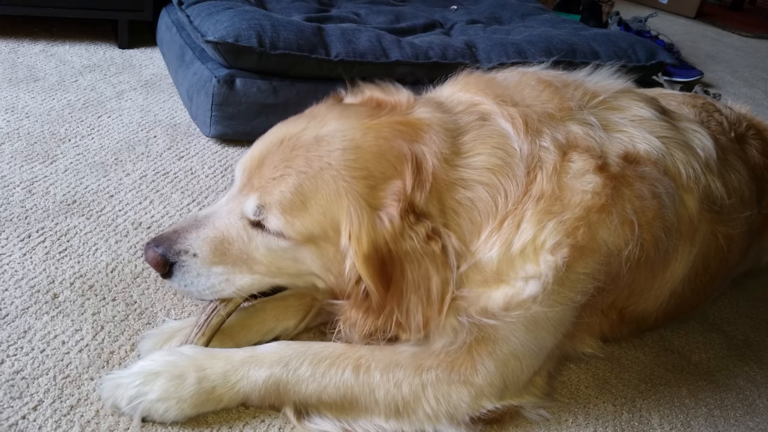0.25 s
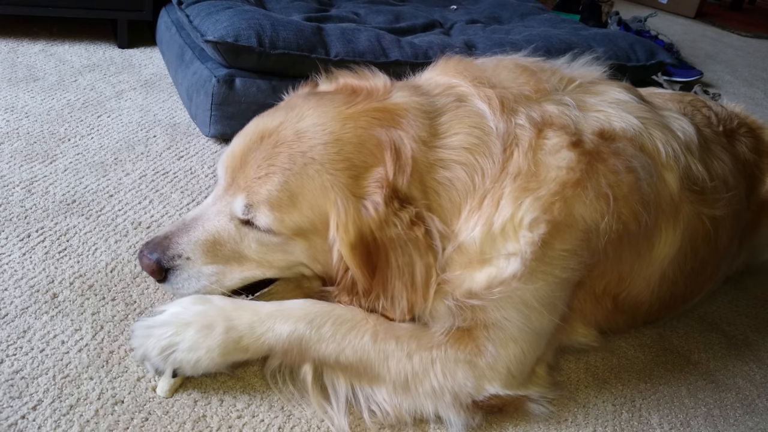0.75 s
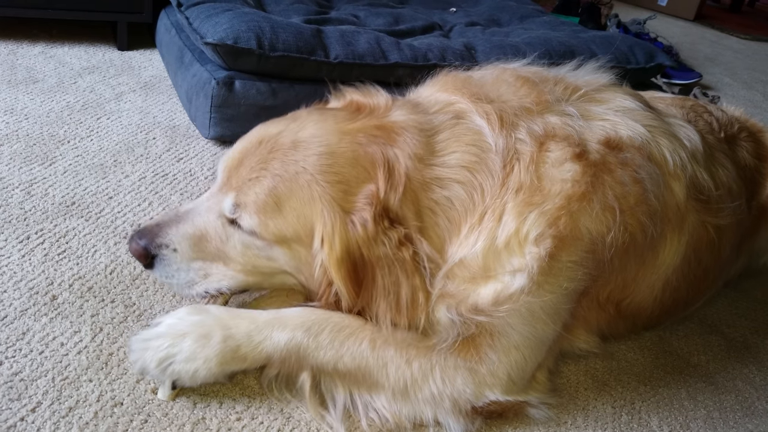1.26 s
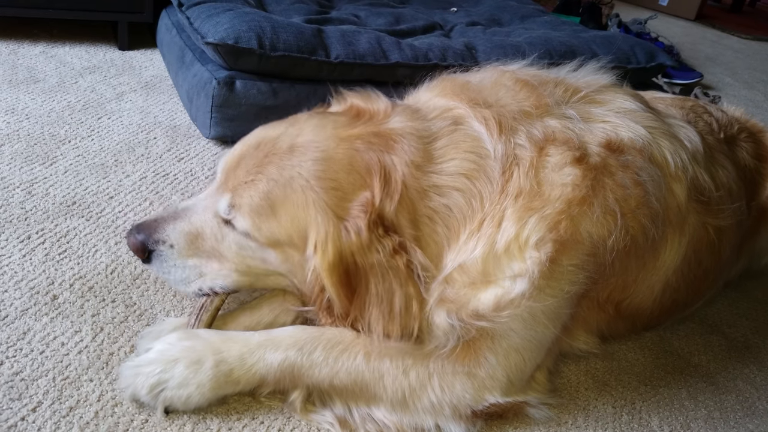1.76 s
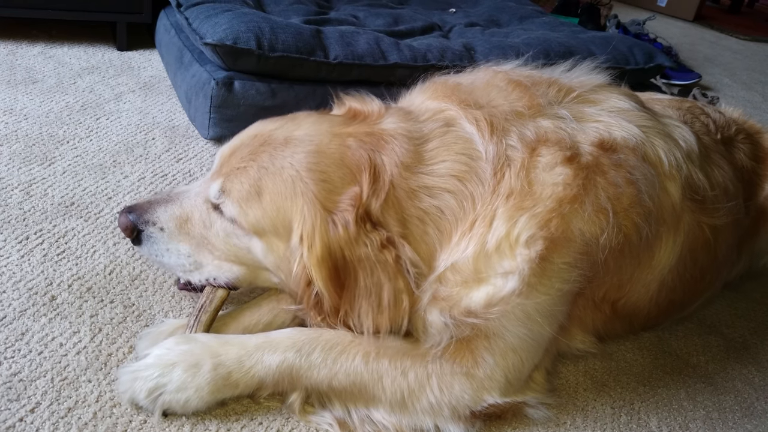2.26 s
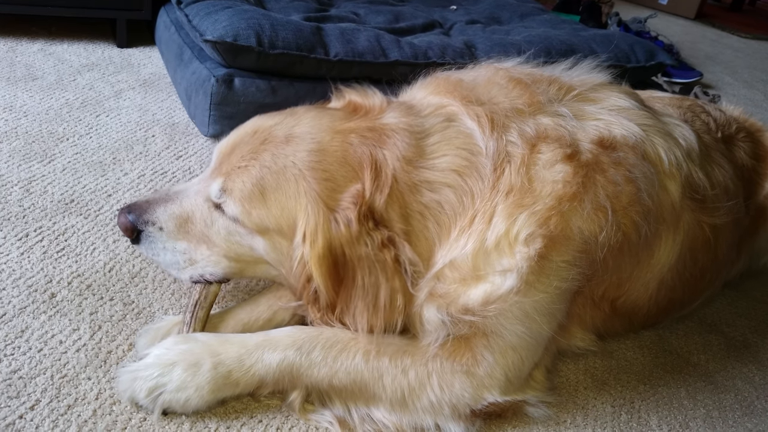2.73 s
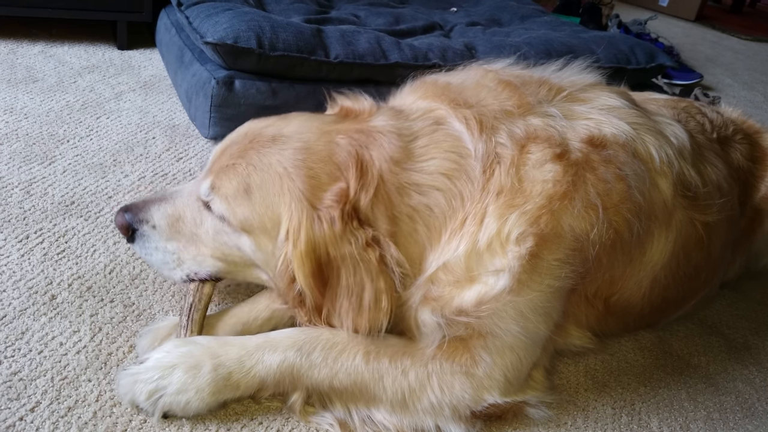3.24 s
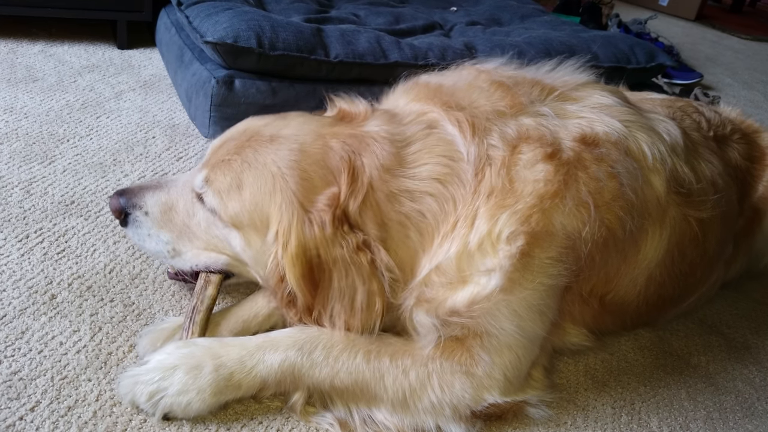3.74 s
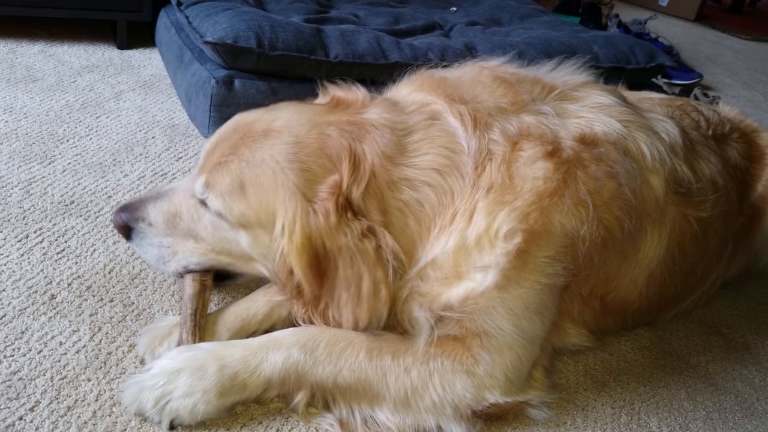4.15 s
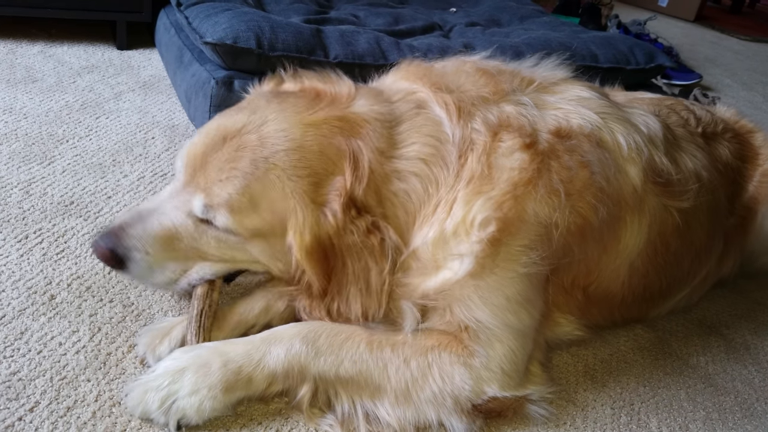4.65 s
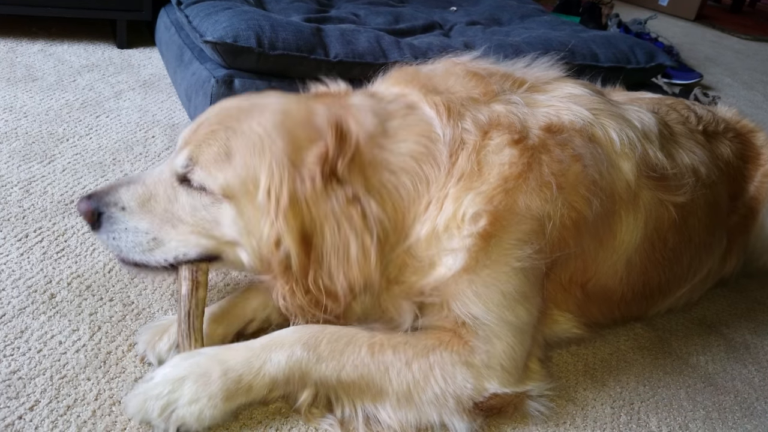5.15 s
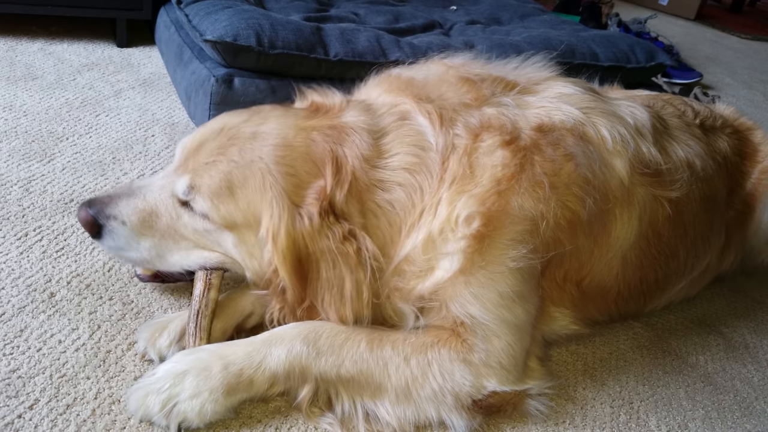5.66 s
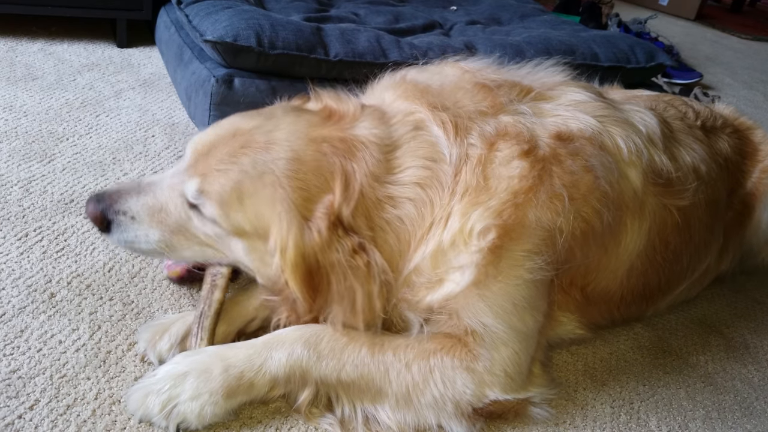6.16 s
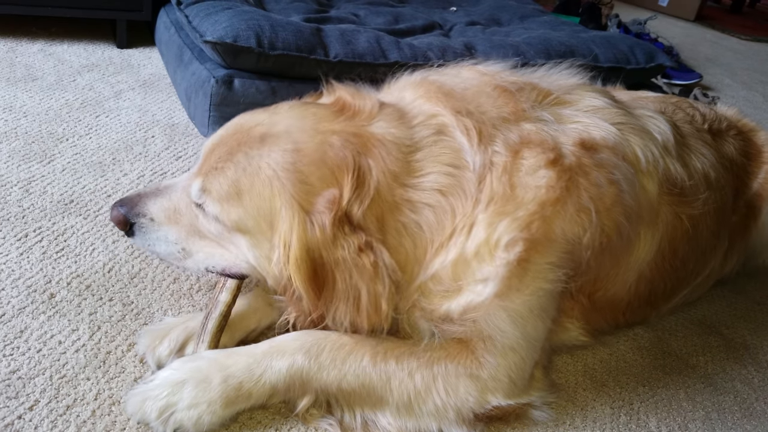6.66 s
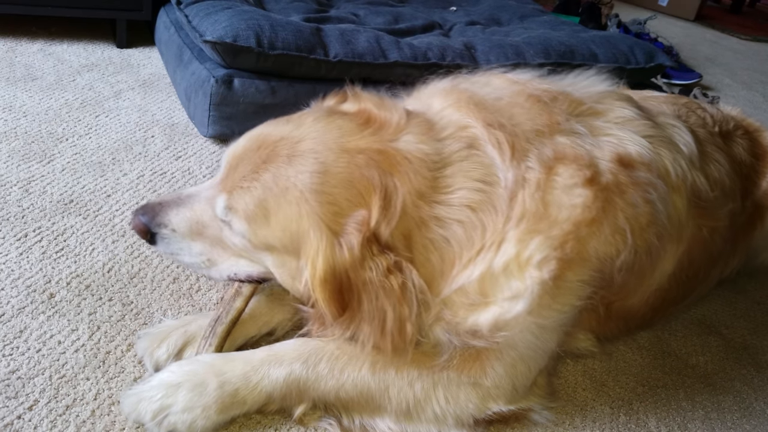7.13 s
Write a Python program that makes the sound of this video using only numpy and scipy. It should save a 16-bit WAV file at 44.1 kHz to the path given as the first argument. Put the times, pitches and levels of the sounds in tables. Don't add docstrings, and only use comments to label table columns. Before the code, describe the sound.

A dog gnaws an antler on carpet, a metre from a hand-held stereo phone in a quiet living room. A quick cluster of faint clacks opens, with a soft rub; light knocks follow around 1 s, a sharper bite at 1.25 and a bony crack at 1.75, then a heavy low handling thump at 1.8, mostly left. Small pops come at 2.2 and 2.75, a double crunch at 3.25. At 3.95 the loudest bite snaps brightly and the antler rings hollowly for about half a second. Scattered clacks continue, with hard cracks at 5.15 and 5.25, more at 5.8 and 5.9, then dense knocks and gritty chips from 6.3 to 6.6 and 6.9 to 7.3. Throughout, fur and paws drag dully, nostrils puff thin air, the grip thumps softly, and a distant appliance whine and low hum waver under gentle hiss.

```python
import sys
import numpy as np
from scipy import signal
from scipy.fft import rfft, irfft
from scipy.io import wavfile
from scipy.ndimage import uniform_filter1d

SR = 44100
rng = np.random.default_rng(int(sys.argv[2]) if len(sys.argv) > 2 else 0)


def transcribe(u):
    v = np.clip(np.atleast_2d(u).T, -1, 1)
    q = np.round(v * 32767).astype(np.int16)
    wavfile.write(sys.argv[1], SR, q)


def decibels_to_gain(level_db):
    exponent = np.asarray(level_db, float) / 20
    return 10 ** exponent


N = 326340
STRIKE_T_S = np.arange(4096) / SR
RIGHT_LAG_SAMPLES = 7


def curve(table):
    rows = np.array(table, float)
    return np.interp(np.arange(N) / SR, rows[:, 0], rows[:, 1])


def colour(x, db_of_hz):
    hz = np.maximum(np.fft.rfftfreq(x.shape[-1], 1 / SR), 1)
    if callable(db_of_hz):
        gain_db = db_of_hz(hz)
    else:
        rows = np.array(db_of_hz, float)
        gain_db = np.interp(np.log(hz), np.log(rows[:, 0]), rows[:, 1])
    return irfft(rfft(x) * decibels_to_gain(gain_db), x.shape[-1])


def unit(x):
    return x / np.sqrt(np.mean(x ** 2))


def pair(table, likeness_hz):
    common, own = rng.standard_normal(N), rng.standard_normal((2, N))
    both = np.array([common, np.roll(common, RIGHT_LAG_SAMPLES)])
    alike = colour(both, lambda hz: -10 * np.log10(1 + (hz / likeness_hz) ** 2))
    apart = colour(own, lambda hz: -10 * np.log10(1 + (likeness_hz / hz) ** 2))
    return colour(alike + apart, table)


def walk(rate_hz):
    hold = int(SR / rate_hz)
    steps = np.repeat(rng.standard_normal(N // hold + 1), hold)
    return uniform_filter1d(steps, hold)[:N]


def ring(t, hz, t60_s, push_s):
    decay = np.exp(-np.log(1000) * t / t60_s)
    return (1 - np.exp(-t / push_s)) ** 2 * decay * np.sin(2 * np.pi * hz * t)


def add(out, s, sound):
    i = max(int(s * SR), 0)
    out[..., i:i + sound.shape[-1]] += sound[..., :N - i]


# f/Hz, level/dB
CRACK_COLOUR = [(6000, -14.5), (8500, -21), (10000, -5.5), (12000, -7), (13500, 5.5), (15000, -11),
                (16500, -46)]
# f/Hz, level/dB
GRIT_COLOUR = [(600, -30), (1100, 11), (1600, 11.5), (2300, 9.5), (3000, 9.5), (3800, 3), (6000, -15),
               (9000, -40)]


def splinter():
    t = STRIKE_T_S
    fits = decibels_to_gain(0.65 * uniform_filter1d(np.repeat(rng.standard_normal(64), 64), 64))
    snap = np.exp(-t / 0.0022)
    crumble = 0.33 * fits * np.exp(-t / 0.011)
    fade = (snap + crumble) * np.minimum(t / 0.00046, 1)
    chips = rng.standard_normal((4, len(t)))
    crack = None
    crack = unit(colour(chips[0] + 2.9 * chips[1:3], CRACK_COLOUR)) * fade
    return crack, unit(colour(chips[3], GRIT_COLOUR)) * fade


def struck(modes, push_s):
    total = 0
    for hz, db, t60_s in modes:
        level_chance, pitch_chance = rng.standard_normal(2)
        mode = ring(STRIKE_T_S[:2048], hz * (1 + pitch_chance / 30), t60_s, push_s)
        total = total + decibels_to_gain(db + 6 * level_chance) * mode
    return total / np.abs(total).max()


# f/Hz, level/dB, t60/s
ANTLER_MODES = [(441, 2, 0.024), (606, 2, 0.02), (750, -1.5, 0.022), (899, -5, 0.032), (1100, -2.5, 0.018)]
# f/Hz, level/dB, t60/s
TOOTH_MODES = [(1300, -1, .01), (1700, -3, .01), (2250, 0, .012), (2800, -6, .009), (3500, -17, .007)]
GRIPPED_RING_DB, SLIPPED_RING_DB, HARD_RING_DB = -10.5, -1, -17.5


def bite(out, s, db, hz, tick_db, antler_db):
    t = STRIKE_T_S
    antler = struck(ANTLER_MODES, .002)
    tick = struck(TOOTH_MODES, .0007)
    swell_s = 0.44 / hz + 0.00018 * decibels_to_gain(2.0 * (db + 15.5))
    shape = (t / swell_s) ** 2 * (np.exp(-t / swell_s) + .06 * np.exp(-t / (1.47 * swell_s)))
    knock = shape / shape.max() * np.cos(2 * np.pi * hz * (t - 2 * swell_s))
    crack, grit = splinter()
    chip_db = 1
    add(out, s - .0008, 0.47 * decibels_to_gain(db + tick_db + chip_db) * crack)
    add(out, s + 0.00016, decibels_to_gain(db + tick_db) * (3.6 * tick + 0.85 * grit[:2048]))
    add(out, s - .0003, -decibels_to_gain(db + antler_db) * antler)
    add(out, s + 0.00219 - 2 * swell_s, -decibels_to_gain(db) * knock)


# t/s, peak level/dB, f/Hz
HARD_BITES = [(1.2477, -33, 440), (1.2517, -28.5, 351), (1.2523, -23.5, 780), (1.747, -20.5, 735),
              (1.7511, -26, 330), (1.753, -26, 590), (2.2353, -39, 290), (3.2501, -30, 850),
              (3.2503, -31, 480), (3.2558, -40, 288), (3.256, -29, 670), (3.3038, -32, 820),
              (3.3065, -30.5, 710), (3.9451, -28, 880), (3.9467, -17, 527), (3.947, -10.5, 760),
              (3.9478, -22, 312), (3.9596, -24, 770), (5.1442, -33, 277), (5.1482, -25, 450),
              (5.1508, -20.5, 320), (5.2464, -29, 480), (5.2484, -18.5, 680), (5.2489, -20.5, 237),
              (5.2507, -30, 657), (5.2658, -28, 683), (5.8091, -27.5, 285), (5.8103, -29.5, 440),
              (5.812, -26, 920), (5.9197, -23.5, 347), (5.9242, -35, 266), (5.926, -28.5, 831),
              (5.9315, -29, 330), (5.9447, -34, 256), (6.3065, -32.5, 360), (6.3164, -34, 394),
              (6.3213, -27.5, 316), (6.3854, -31.5, 256), (6.3864, -25.5, 337), (6.3866, -20, 845),
              (6.4, -28, 286), (6.488, -22.5, 434), (6.4881, -29.5, 950), (6.489, -28, 211),
              (6.4928, -25.5, 292), (6.5683, -32, 300), (6.5724, -35, 195), (6.9116, -30, 362),
              (6.9213, -31, 346), (6.9214, -30.5, 800), (7.1816, -25, 940), (7.1853, -23, 344),
              (7.1853, -23, 880), (7.1986, -32.5, 237), (7.2328, -35, 379), (7.2448, -26, 990),
              (7.245, -23, 410), (7.2486, -33, 379), (7.306, -30.5, 390)]


def hard_bites(out):
    for s, db, hz in HARD_BITES:
        bite(out, s, db, hz, -33, HARD_RING_DB)


# t/s, level/dB, f/Hz
PINGS = [(1.246, -44, 2300), (1.747, -56, 3740), (1.7474, -49, 3400), (1.7487, -43, 1550),
         (1.7501, -44, 2460), (1.7523, -44, 2010), (3.2576, -46, 2150), (3.9457, -41, 5940),
         (3.947, -32.5, 3720), (3.948, -28, 2520), (3.9477, -31, 1600), (3.9511, -33, 2090),
         (3.9552, -48, 4760), (3.9588, -50, 3980), (3.9594, -46, 3140), (3.9599, -41, 2520),
         (3.9605, -37, 2200), (5.15, -46, 3900), (5.1507, -41, 3120), (5.151, -42, 2400),
         (5.1505, -40, 1150), (5.2481, -28.5, 2040), (5.2488, -51, 5000), (5.2513, -29, 1690),
         (5.2497, -42, 3730), (5.2494, -26, 2680), (5.8094, -53, 3900), (5.8103, -38, 1960),
         (5.8104, -42, 3150), (5.8128, -39, 2630), (5.9187, -50, 1310), (5.9215, -48, 3570),
         (5.9324, -40, 2930), (5.9305, -40, 1700), (5.9336, -44, 2200), (6.3874, -37.5, 3510),
         (6.388, -38, 1460), (6.3899, -49, 2130), (6.3904, -45, 2430), (6.4905, -32.5, 2240),
         (6.491, -39, 2760), (6.5632, -43, 1530), (6.5633, -44, 1310), (6.5635, -46, 3450),
         (6.5641, -41, 2850), (6.5668, -47, 1810), (6.9217, -46, 2220), (6.9242, -46, 1650),
         (7.186, -56, 3770), (7.1862, -45, 2990), (7.245, -42, 2950), (7.2455, -38, 1550),
         (7.1862, -38, 1500), (7.1866, -42, 2050), (7.3059, -41, 2820), (7.3112, -46, 3300),
         (7.3096, -44, 1470)]


def pings(out):
    for s, db, hz in PINGS:
        add(out, s, 2.72 * decibels_to_gain(db) * ring(STRIKE_T_S[:1024], hz, 0.013, 0.00056))


# t/s, peak level/dB, jaw f/Hz, tick level/dB re knock
KNOCKS = [(.006, -33.5, 282, -22), (.081, -47, 870, -6), (.987, -37.5, 350, -32), (1.21, -32.5, 217, -27),
          (1.633, -38, 318, -23), (2.7615, -33, 750, -35), (3.948, -34, 180, -35), (4.217, -34, 320, -31),
          (4.81, -36, 497, -22), (5.133, -31.5, 186, -21), (5.607, -33.5, 350, -27),
          (7.236, -32.5, 200, -28), (7.312, -33.5, 230, -25), (7.342, -32, 360, -24)]


def knocks(out):
    for s, db, hz, tick_db in KNOCKS:
        bite(out, s, db, hz, tick_db, GRIPPED_RING_DB)


# t/s, peak level/dB, jaw f/Hz, tick level/dB re knock
CLACKS = [(.062, -35, 305, -24), (.074, -34, 201, -27), (4.486, -35.5, 258, -23), (4.499, -51, 203, -1),
          (4.536, -39, 430, -20), (4.599, -33.5, 780, -22), (4.934, -42, 340, -16), (5.282, -35, 505, -12),
          (5.423, -34.5, 417, -19), (5.654, -44, 330, -10), (5.972, -43, 410, -13), (6.378, -39, 500, -10),
          (7.076, -37, 320, -17)]


def clacks(out):
    for s, db, hz, tick_db in CLACKS:
        bite(out, s, db, hz, tick_db, SLIPPED_RING_DB)


# t/s, peak level/dB, jaw f/Hz
NIBBLES = [
    (1.4, -38, 463),
    (1.459, -38, 676),
    (1.519, -44, 573),
    (2.684, -38, 850),
    (3.09, -36, 470),
    (4.299, -45, 368),
    (4.419, -39, 353),
    (4.718, -42, 455),
    (6.037, -41, 402),
]


def nibbles(out):
    for s, db, hz in NIBBLES:
        bite(out, s, db, hz, -28, GRIPPED_RING_DB)


# t/s, peak level/dB, f/Hz
TAPS = [(0.065, -35, 880), (1.245, -35, 760), (3.711, -48, 864), (3.777, -37, 926), (3.902, -42, 638),
        (4.487, -37, 915), (4.536, -34, 674), (5.147, -36, 622), (5.424, -34, 670), (5.6543, -34, 1030),
        (6.319, -33, 950), (6.388, -25, 916), (6.565, -35, 880), (6.9128, -30, 760), (7.078, -36, 616),
        (7.307, -29, 910), (7.34, -35, 659)]


def taps(out):
    for s, db, hz in TAPS:
        add(out, s, -1.8 * decibels_to_gain(db) * ring(STRIKE_T_S[:1024], hz, 0.017, 0.0011))


# t/s, peak level/dB, f/Hz
POPS = [(1.7575, -30, 420), (2.2338, -29, 700), (2.247, -34, 330), (2.7623, -32, 650), (2.773, -32, 420),
        (4.889, -34, 400), (4.9356, -26.5, 560), (5.6562, -29, 340), (5.9345, -29, 850), (5.9475, -34, 600),
        (6.3208, -29, 750), (7.1875, -19.5, 760), (7.2006, -30, 500), (7.2469, -26, 520)]


def pops(out):
    length_cycles, rebound_rad = .48, .45
    for s, db, hz in POPS:
        cycles = hz * STRIKE_T_S - 2
        pulse = np.exp(-(cycles / length_cycles) ** 2) * np.cos(2 * np.pi * cycles + rebound_rad)
        add(out, s - 2 / hz, -decibels_to_gain(db) * pulse)


# t/s, peak level/dB
CRUNCHES = [(1.752, -56), (2.232, -58), (2.761, -60), (3.251, -52), (3.257, -51), (3.306, -58),
            (3.968, -50), (3.988, -52), (5.255, -43), (5.264, -48), (5.28, -52), (5.928, -50), (6.379, -54),
            (6.394, -52), (6.402, -56), (6.489, -50), (6.496, -54), (6.572, -56), (7.186, -49),
            (7.306, -48), (7.314, -52)]


def crunches(out):
    for s, db in CRUNCHES:
        _, grit = splinter()
        add(out, s, decibels_to_gain(db) * grit)


# t/s, peak level/dB, grit level/dB re crack
SNAPS = [(0.063, -45, -17), (0.0698, -47, -20), (0.0754, -46, -17), (0.0812, -46, -19), (1.249, -46, -15),
         (1.2527, -41, -20), (1.518, -46, -20), (1.748, -46, -5), (1.7529, -44, -7), (2.0595, -46, -21),
         (3.0374, -46, -20), (3.2496, -44, -15), (3.9472, -23, -22), (3.9502, -20.5, -20),
         (3.9555, -27, -23), (3.9629, -36, -18), (3.9684, -43, -18), (3.971, -46, -15), (3.9754, -45, -13),
         (3.9827, -45, -12), (3.9917, -47, -10), (4.7708, -43, -27), (4.8118, -50, -21), (5.0108, -43, -20),
         (5.143, -31.5, -27), (5.1477, -29, -7), (5.1507, -34.5, -3), (5.1566, -46, -16),
         (5.1595, -47, -17), (5.2481, -22, -11.5), (5.258, -32, -4), (5.2613, -40, -14), (5.2636, -39, -12),
         (5.2685, -46, -19), (5.5563, -38, -26), (5.7064, -46, -21), (5.809, -32.5, -18), (5.814, -38, -18),
         (5.8222, -45, -23), (5.9221, -34, -26), (5.9335, -37, -7), (5.9369, -47, -9), (5.9443, -47, -14),
         (6.3196, -43, -17), (6.384, -41, -3), (6.3887, -39.5, 2.5), (6.5651, -40, -9), (7.1797, -49, -10),
         (7.1818, -41.5, 0), (7.186, -46, 6), (7.245, -38.5, -4), (7.3281, -45, -18)]


def snaps(out):
    for s, db, grit_db in SNAPS:
        crack, grit = splinter()
        add(out, s, decibels_to_gain(db) * (0.55 * crack + decibels_to_gain(grit_db) * grit))


def gnawing():
    out = np.zeros((2, N))
    for contact in (knocks, clacks, nibbles, hard_bites, pings, taps, pops, crunches, snaps):
        contact(out)
    return out


# t/s, level/dB, f/Hz, t60/s
FREE_RINGS = [(3.306, -39, 700, 0.09), (1.752, -43, 2280, 0.07), (1.76, -46, 740, 0.08),
              (3.978, -34, 540, 0.16), (3.972, -36, 855, 0.14), (3.99, -40, 645, 0.3),
              (5.277, -40, 2000, .05), (5.252, -41, 604, 0.074), (5.94, -39, 880, 0.3), (5.3, -38, 960, .1),
              (3.947, -32, 1150, 0.03), (5.249, -27.5, 1140, 0.035), (1.256, -34, 840, .06),
              (6.392, -40, 970, 0.14), (6.49, -30, 1050, 0.03), (6.566, -32, 910, 0.03),
              (7.192, -38, 1000, 0.3), (7.3065, -33.5, 2210, 0.036)]
# t/s, level/dB, f/Hz, t60/s
LONG_RING = (3.9536, -30.5, 758, .66)


def free_rings():
    out, t = np.zeros(N), np.arange(SR // 2) / SR
    regrip = np.exp(-np.maximum(t - 0.15, 0) / .03)
    for s, db, hz, t60_s in FREE_RINGS + [LONG_RING]:
        level = decibels_to_gain(db + 1.8 * walk(72)[:len(t)])
        add(out, s, level * ring(t, hz, t60_s, t60_s / 60) * regrip)
    return out


# f/Hz, level/dB
ROOM_COLOUR = [(100, 18), (300, -7), (550, -3.5), (760, -6), (1050, .5), (2000, 0), (2700, -7.5),
               (6000, 2.5), (13000, -11)]


def room(x):
    t60_s, top_t60_s, echo_db = 0.51, 0.39, -9.5
    t = np.arange(SR // 2) / SR
    noise = pair(ROOM_COLOUR, 800)[:, :len(t)] * np.minimum(t / 0.0136, 1)
    low = colour(noise, lambda hz: -10 * np.log10(1 + (hz / 1500) ** 4))
    tail = low * decibels_to_gain(-60 * t / t60_s) + (noise - low) * decibels_to_gain(-60 * t / top_t60_s)
    tail = decibels_to_gain(echo_db) * tail / np.sqrt(np.sum(tail ** 2) / 2)
    return signal.fftconvolve(x[None], tail, axes=1)[:, :N]


# f/Hz, level/dB
DOG_SIDE = [(100, -0.5), (700, 0.5), (1300, -7.5), (2400, 2), (4400, 12), (6000, 5.5), (8100, -2.5),
            (13000, -7.5), (16000, -9)]


def antler_in_room():
    teeth = gnawing()
    echo = room(teeth[0])
    teeth = teeth + free_rings()
    heard = np.array([teeth[0], np.roll(teeth[1], RIGHT_LAG_SAMPLES)]) + echo
    side = np.array(DOG_SIDE, float)
    return np.array([colour(heard[0], side * [1, .5]), colour(heard[1], side * [1, -.5])])


# t/s, peak level/dB, f/Hz
THUMPS = [(0.036, -24.5, 59), (0.078, -34, 48), (0.386, -28, 80), (1.164, -32, 53.7), (1.322, -33.5, 101),
          (1.832, -14.5, 75.6), (1.951, -46, 51), (2.158, -26.5, 65.6), (2.659, -29, 32),
          (2.727, -22.5, 73.6), (2.8, -31, 123), (2.855, -34, 126), (2.927, -28, 131), (3.091, -21, 81.5),
          (3.209, -33, 81), (3.345, -28, 82), (3.506, -28, 74.5), (4.089, -27, 73.4), (4.543, -29.5, 98),
          (4.647, -45, 65.2), (5.032, -25, 69), (5.128, -31, 80), (5.184, -43, 46), (5.3, -38, 72.6),
          (5.684, -26.5, 78.4), (6.2885, -25, 79), (6.61, -28, 83), (6.673, -27, 69.5), (7.236, -26, 89.5),
          (7.369, -25.5, 92.5)]


def thumps():
    out, t = np.zeros(N), STRIKE_T_S
    fade = (1 - np.exp(-t / 0.0061)) * np.exp(-(t / 0.023) ** 2)
    for s, db, hz in THUMPS:
        cycles = hz * (0.787 * t + 0.011 * (1 - np.exp(-t / 0.012)))
        add(out, s - .002, -1.6 * decibels_to_gain(db) * fade * np.sin(2 * np.pi * cycles))
    return out * decibels_to_gain([[0], [-24]]) * np.array([[1], [-1]])


# t/s, level/dB
DRAG = [(0, -54), (.68, -56), (1.11, -48.5), (1.4, -44), (1.89, -46), (2.41, -56), (2.82, -45.5), (3, -54),
        (3.56, -58), (4.3, -52.5), (4.9, -40), (5.1, -49.5), (5.5, -52.5), (5.83, -53), (6.51, -42.5),
        (6.64, -59), (6.94, -50.5), (7.4, -41)]
# middle t/s, length/s, level/dB
RUBS = [(0, 0.25, -49.5), (1.028, 0.34, -48), (1.4, 0.93, -55), (2.214, 0.24, -49), (2.805, 0.41, -57),
        (3.283, 0.31, -49.5), (3.85, 0.57, -54), (4.423, 0.28, -43.5), (4.844, 0.38, -51.5),
        (5.266, 0.42, -49.5), (5.68, 0.12, -51), (6.492, 0.24, -55.5), (6.71, 0.13, -49),
        (7.203, 0.14, -43.5), (7.388, 0.24, -48)]


def carpet():
    rumble = unit(pair([(40, 2), (90, 7.5), (150, 7.5), (200, 5), (400, -46)], 370))
    rub = unit(pair([(90, -20), (190, 5.5), (280, 6.0), (380, 5.0), (600, -15), (2000, -50)], 650))
    brush = unit(pair([(200, -18.0), (450, 2.5), (850, 1.0), (1500, -10.0), (3000, -23), (8000, -33.5)], 1140))
    t, lean_db = np.arange(N) / SR, curve(DRAG)
    strokes = sum(decibels_to_gain(db) * np.exp(-((t - s) / (0.39 * length)) ** 2) for s, length, db in RUBS)
    brushing = decibels_to_gain(-54.5 + 0.58 * (lean_db - lean_db.mean())) + 0.36 * strokes
    rubbing = decibels_to_gain(-58.5) + strokes
    layers = ((rumble, decibels_to_gain(lean_db)), (rub, rubbing), (brush, brushing))
    return sum(noise * level * decibels_to_gain(-2.5 + 2 * walk(35)) for noise, level in layers)


# f/Hz, level/dB
NOSE_COLOUR = [(5000, -37), (9000, -22), (10300, -16), (11500, 4.5), (13200, 6), (14500, 2), (16000, -4)]
# start t/s, length/s, level/dB
PUFFS = [(.03, .1, -71), (.55, .14, -65), (1.01, 0.16, -63), (1.327, 0.16, -66), (1.51, 0.16, -63),
         (2.03, .2, -61.5), (2.583, 0.11, -63), (3.017, 0.12, -63.5), (3.55, 0.13, -63), (3.75, .06, -68),
         (4.202, 0.081, -70), (4.74, 0.14, -62), (4.99, 0.045, -65), (5.266, 0.09, -67), (5.67, 0.072, -65),
         (6.2, .1, -69), (6.6, .1, -77), (7.29, 0.047, -60)]


def nose():
    flow = np.zeros(N)
    for s, length, db in PUFFS:
        u = np.linspace(0, 1, int(1.25 * length * SR))
        add(flow, s, decibels_to_gain(db + 2.5) * np.sin(np.pi * u ** 0.65) ** .8)
    flutter = decibels_to_gain(3.4 * walk(110) + np.array([[-4.0], [3.0]]))
    return unit(pair(NOSE_COLOUR, 300)) * flow * flutter


def motor_tone(hz, db, side_db):
    phase = 2 * np.pi * np.cumsum(hz + 0.32 * walk(3.11)) / SR
    return np.sqrt(2) * decibels_to_gain(db + np.array([[side_db], [-side_db]])) * np.sin(phase)


# t/s, level/dB
MOTOR = [(0, -47), (.45, -47.5), (.8, -53.5), (.95, -59), (1.7, -57.5), (2.15, -62), (2.27, -51),
         (3, -49.5), (3.6, -48), (4.15, -55.5), (4.4, -55.5), (4.75, -63), (5.1, -58), (5.45, -57),
         (6.4, -50.5), (6.6, -47.5), (7.1, -52.5), (7.4, -55)]
# f/Hz, level/dB
HUM = [(60, -59.5), (120, -56), (183, -59.5), (205, -58.5), (240.5, -58.5), (361, -65.5)]


def appliance():
    whine_db = curve(MOTOR)
    drone_db = -48.5 + 0.25 * (whine_db - whine_db.mean())
    out = motor_tone(408.3, whine_db + 1.14 * walk(6.7), -1.5)
    out = out + motor_tone(90.9, drone_db + 1.6 * walk(16), -.3)
    for hz, db in HUM:
        out = out + motor_tone(hz, db + 2.4 * walk(1.826), -1.2)
    return out


# f/Hz, level/dB per Hz
AIR = [(20, -98.5), (60, -90.5), (100, -85), (160, -89.5), (300, -81.5), (700, -83), (1000, -85),
       (1400, -95.5), (2300, -99), (4000, -106), (6000, -112), (8500, -111), (12500, -100), (15900, -101)]
# f/Hz, width/Hz, level/dB
LEFT_PORT = [(37, 144, 22), (1310, 370, 8), (2332, 650, 11), (3400, 150, 4), (3990, 525, -10.5),
             (4866, 2165, 22.5)]


def air():
    hiss = pair(AIR, 320) * np.sqrt(SR / 2)
    left = colour(hiss[0], lambda hz: sum(db * np.exp(-(2 * (hz - f) / w) ** 2 / 2) for f, w, db in LEFT_PORT))
    return np.array([left, hiss[1]]) * decibels_to_gain(0.17 * walk(8.2))


def scene():
    return antler_in_room() + thumps() + carpet() + nose() + appliance() + air()


def band_limit(x):
    return signal.sosfilt(signal.butter(12, 16490, fs=SR, output="sos"), x)


def record(dry):
    mix = colour(dry, lambda hz: -70. * (hz > 15820))
    return band_limit(mix)


dry = scene()
out = record(dry)
transcribe(out)
```